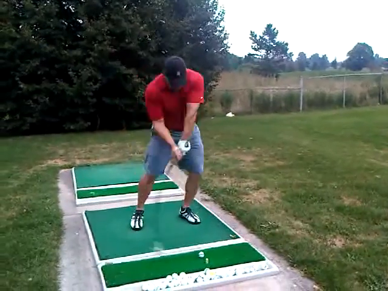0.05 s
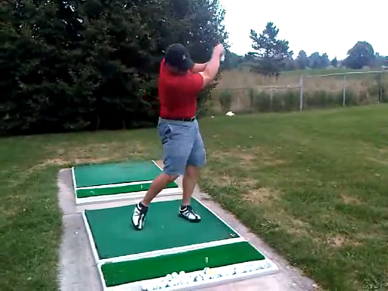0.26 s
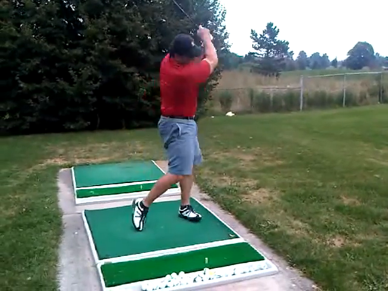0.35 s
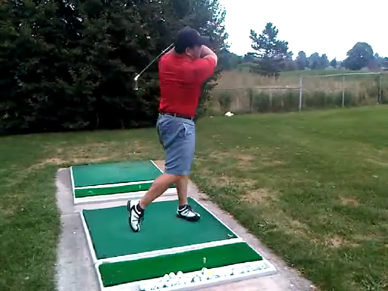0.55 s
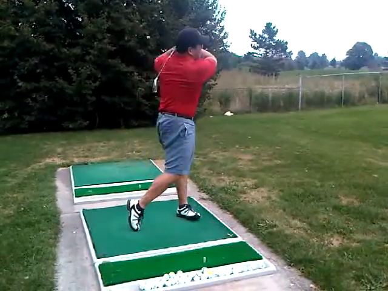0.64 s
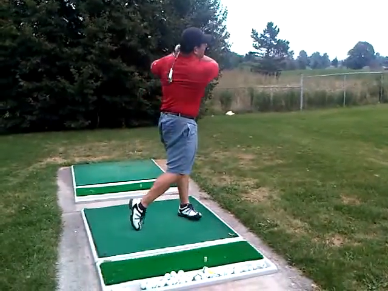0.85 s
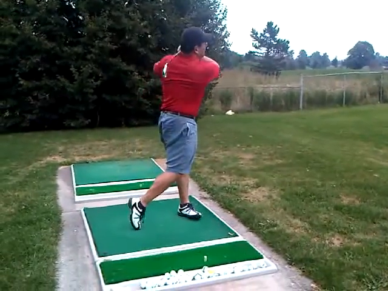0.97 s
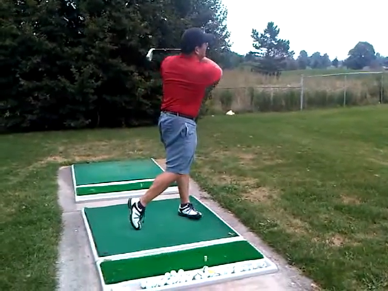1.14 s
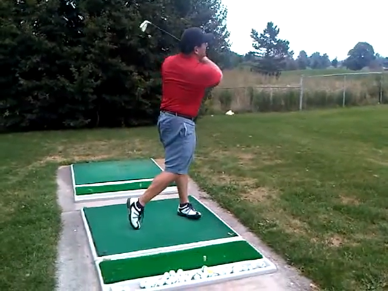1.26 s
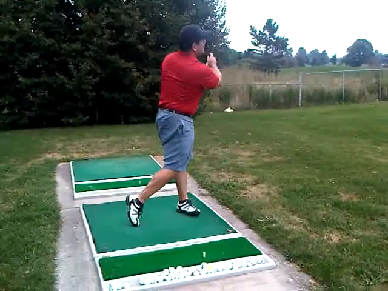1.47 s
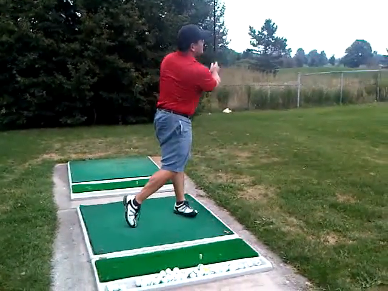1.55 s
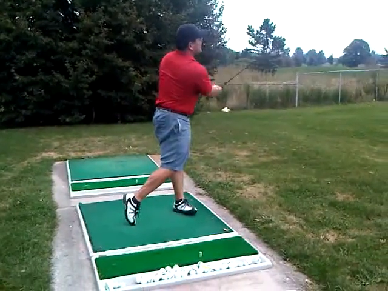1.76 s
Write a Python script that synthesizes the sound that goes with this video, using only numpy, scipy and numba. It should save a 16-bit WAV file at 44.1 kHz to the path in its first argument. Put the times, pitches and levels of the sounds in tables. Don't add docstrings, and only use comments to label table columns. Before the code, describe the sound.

Single golf shot outdoors: a short swish, a hard bright click with a tiny metallic ring and slap, a faint scatter off grass and trees, then gusts buffeting a small dull microphone over faint leaf hiss.

```python
import sys
import numpy as np
from scipy import signal
from scipy.fft import dct
from scipy.io import wavfile
from scipy.ndimage import uniform_filter1d
from numba import njit

SR = 44100
rng = np.random.default_rng(int(sys.argv[2]) if len(sys.argv) > 2 else 0)


def rack_gain(trim_db):
    fader = np.asarray(trim_db, float)
    return 10 ** (fader / 20)


def materialize(psi):
    bounded = np.clip(np.atleast_2d(psi).T, -1, 1)
    quanta = np.round(bounded * 32767).astype(np.int16)
    wavfile.write(sys.argv[1], SR, quanta)


N = 79380


@njit
def svf(x, hz, width):
    y, band, low = np.empty(len(x)), 0., 0.
    for i in range(len(x)):
        g = np.tan(np.pi * hz[i] / SR)
        damping = width[i] / hz[i]
        v = (band + g * (x[i] - low)) / (1 + g * (g + damping))
        band = 2 * v - band
        low = low + 2 * g * v
        y[i] = damping * v
    return y


def noise(hz, width_hz):
    hz, width_hz = hz * np.ones(N), width_hz * np.ones(N)
    once = svf(rng.standard_normal(N), hz, width_hz)
    twice = svf(once, hz, width_hz)
    return twice / np.sqrt(np.mean(twice ** 2))


def walk(rate):
    hold = int(SR / rate)
    steps = np.repeat(rng.standard_normal(N // hold + 1), hold)
    return 1.3 * uniform_filter1d(uniform_filter1d(steps, hold), hold)[:N]


def add(out, s, db, hz, cycles, phase):
    half = int(2 * cycles / hz * SR)
    i = np.arange(max(int(s * SR) - half, 0), min(int(s * SR) + half, N))
    turns = (i / SR - s) * hz
    bell = np.exp(-(2 * turns / cycles) ** 2)
    out[i] += rack_gain(db) * bell * np.cos(2 * np.pi * turns + phase)


def fade(t, start_s, t60_s):
    return (t >= start_s) * rack_gain(-60 * np.maximum(t - start_s, 0) / t60_s)


def hiss():
    # (frequency [Hz], density [dB per Hz])
    air_tilt = [(60, -9.5), (150, -3.5), (400, -8.5), (700, 1.5), (1300, -4.5), (4400, -13.5),
                (6400, -19.5), (7600, -22.5)]
    tilt_hz, tilt_db = np.array(air_tilt).T
    level_db, swell_db, flicker_db = -73, -1, -1
    out, swell = 0, walk(12)
    for hz in 60 * 2 ** np.arange(0, 7.1, .5):
        db = np.interp(np.log(hz), np.log(tilt_hz), tilt_db) + 10 * np.log10(hz)
        db = db + swell_db * swell + flicker_db * walk(12)
        out = out + rack_gain(db) * noise(hz, hz / 2)
    return rack_gain(level_db) * out / np.sqrt(np.mean(out ** 2))


def rustle(t):
    # (time [s], level [dB], centre [Hz], length [s])
    leaf_swells = [
        (.42, -81, 3000, .025),
        (.93, -81, 3200, .02),
        (1.622, -86, 4400, .013),
        (1.75, -84, 2800, .03),
    ]
    out = np.zeros(N)
    for s, db, hz, length_s in leaf_swells:
        out += rack_gain(db) * np.exp(-((t - s) / length_s) ** 2) * noise(hz, hz / 2)
    return out


def wind(t):
    # (time [s], level [dB])
    gust_curve = [(0, -65.5), (0.099, -69.5), (.17, -72), (.29, -70), (0.331, -56), (.37, -63),
                  (.56, -68.5), (0.664, -61), (0.684, -50), (0.978, -44.5), (1.05, -51), (1.261, -49.5),
                  (1.31, -63), (1.41, -59.5), (1.438, -48), (1.542, -58), (1.559, -61.5), (1.8, -66)]
    # (time [s], peak [dB], pitch [Hz])
    main_puffs = [(0.332, -41.5, 115.3), (0.392, -44, 133), (0.485, -47, 152), (0.514, -47.5, 144),
                  (0.687, -38, 129), (0.723, -39.5, 148.6), (0.757, -36.5, 197), (0.789, -32.5, 175),
                  (0.816, -31, 183), (0.839, -36.5, 129), (0.861, -43, 164), (0.893, -31, 159),
                  (0.926, -33, 203), (0.967, -33, 174), (0.992, -34, 185), (1.025, -34.5, 183),
                  (1.085, -38, 144), (1.106, -35, 167), (1.139, -37, 198), (1.202, -37, 163),
                  (1.22, -41.5, 136.7), (1.253, -40.5, 136), (1.275, -43, 153), (1.378, -40, 139),
                  (1.433, -36, 154), (1.464, -43.5, 150), (1.526, -38.5, 228), (1.576, -42, 205),
                  (1.604, -43.5, 130), (1.728, -42, 145)]
    # (time [s], peak [dB], pitch [Hz])
    more_puffs = [(.303, -46, 110), (.322, -48, 105), (.41, -51, 115), (.47, -52, 140), (.6, -57, 80),
                  (.628, -50, 95), (.978, -35, 130), (1.18, -44, 200), (1.445, -39, 170), (1.5, -46, 200),
                  (1.665, -55, 180), (1.745, -52, 130)]
    # (time [s], peak [dB], pitch [Hz])
    eddy_flicks = [(.678, -52, 330), (.758, -44, 400), (.894, -45, 520), (.926, -46, 450), (.957, -47, 480),
                   (.965, -43, 450), (.991, -43, 400), (1.022, -50, 350), (1.09, -52, 400),
                   (1.138, -50, 500), (1.2, -52, 380), (1.432, -50, 330), (1.463, -51, 380),
                   (1.526, -50, 380)]
    # (centre [Hz], width [Hz], level over the gust [dB], extra per dB of gust [dB])
    port_bands = [
        (55, 35, -10, -.3),
        (105, 70, -2, -.05),
        (190, 110, -5, .2),
        (320, 130, -19, .5),
    ]
    puff_db, puff_cycles = -0.5, 1.1
    buffet_db, buffets_per_s, own_db = 2.4, 55, 2.2
    port_top_hz = 420

    puffs = np.zeros(N)
    eddies = list(main_puffs) + list(more_puffs) + list(eddy_flicks)
    for (s, db, hz), turn in zip(eddies, rng.random(len(eddies))):
        add(puffs, s, db + puff_db, hz, puff_cycles, 2 * np.pi * turn)

    when, db = np.array(gust_curve).T
    gust = np.interp(t, when, db) + buffet_db * walk(buffets_per_s)
    flow = 0
    for hz, width_hz, over_db, steep in port_bands:
        band_db = gust + over_db + steep * (gust - db.max()) + own_db * walk(29.99)
        flow = flow + rack_gain(band_db) * noise(hz, width_hz)
    return puffs + signal.sosfilt(signal.butter(2, port_top_hz, fs=SR, output="sos"), flow)


def swing(t):
    # (time [s], vortex pitch of the shaft [Hz], level [dB])
    downswing = [
        (0.111, 250, -85),
        (.14, 310, -72.5),
        (0.166, 450, -62),
        (0.186, 610, -54.5),
        (.21, 620, -57.5),
        (0.237, 420, -61),
        (.265, 300, -66),
        (.3, 250, -84),
    ]
    when, pitch_hz, db = np.array(downswing).T
    head_db, head_steep = -5, 1.8
    hz = np.interp(t, when, pitch_hz)
    level_db = np.interp(t, when, db, left=-120, right=-120)
    shaft = rack_gain(level_db + 3.1 * walk(120)) * noise(hz, .6 * hz)
    tear_db = db.max() + head_db + head_steep * (level_db - db.max())
    return shaft + rack_gain(tear_db + 1.5 * walk(200)) * noise(2000, 3200)


def strike(t):
    # (time [s], level [dB], pitch [Hz], cycles)
    contacts = [
        (.21779, -13, 2600, .85),
        (.21852, -20.5, 5200, .9),
        (.21933, -20, 3000, 1.2),
        (.2211, -26, 2900, 1.1),
        (.22175, -25.5, 1800, 1.3),
        (.2244, -32, 1900, 1.4),
        (.21826, -29, 6400, 5),
    ]
    # (time [s], level [dB], pitch [Hz], cycles)
    late_knocks = [
        (.232, -45, 600, 1.1),
        (.231, -48, 6000, 8),
        (.2485, -48, 1400, 2.5),
        (.226, -56, 260, 2.5),
        (.245, -58, 200, 3),
        (.263, -60, 150, 2),
    ]
    # (frequency [Hz], level [dB], t60 [s])
    head_modes = [(460, -11, .045), (780, -15, .03), (940, -15, .03), (1300, -7, .035), (1720, -6, .035),
                  (2045, -1, .035), (2640, -5, .04), (3250, 0, .038), (3950, -13, .025), (4550, -9, .028),
                  (5000, -8, .025), (6250, -13, .022), (6720, -14, .02)]
    strike_s, ring_db = .2181, -35
    rattle_db, rattle_t60_s = -39, .035
    scatter_db, scatter_t60_s = -51.5, .23
    trees_s, trees_db, trees_spread_s = .247, -57, .008

    clicks = np.zeros(N)
    for s, db, hz, cycles in list(contacts) + list(late_knocks):
        add(clicks, s, db, hz, cycles, np.pi / 2)

    ring = np.zeros(N)
    for k, (hz, db, t60_s) in enumerate(head_modes):
        tone = np.sin(2 * np.pi * hz * (t - strike_s))
        ring += (-1) ** k * rack_gain(ring_db + db) * fade(t, strike_s, t60_s) * tone

    rattle = rack_gain(rattle_db + 5.9 * walk(900)) * fade(t, strike_s, rattle_t60_s) * noise(2800, 3200)
    grass = rack_gain(scatter_db) * fade(t, strike_s, scatter_t60_s)
    trees = rack_gain(trees_db) * np.exp(-((t - trees_s) / trees_spread_s) ** 2)
    grain = rack_gain(2.2 * walk(250))
    return clicks + ring + rattle + (grass + trees) * grain * noise(2240, 4000)


def scene():
    t = np.arange(N) / SR
    return (hiss() + rustle(t) + wind(t) + swing(t) + strike(t))[None]


def starve(x):
    # (centre time [s], treble thins above [Hz], length [s])
    thin_moments = [(.15, 6800, .07), (.41, 4300, .085), (.54, 3300, .085), (.665, 2600, .085),
                    (.772, 4800, .03), (.79, 4600, .03), (.808, 5200, .03), (1.092, 4500, .03),
                    (1.11, 4200, .03), (1.128, 3000, .03), (1.24, 2700, .075), (1.37, 2600, .08),
                    (1.5, 4800, .085), (1.62, 5200, .085)]
    keep_over_db, kept_db = 6.2, 3.5
    out = x.copy()
    for s, hz, length_s in thin_moments:
        size = int(length_s * SR)
        bell = np.sqrt(signal.windows.tukey(size, .7))
        line_hz = np.arange(size) * SR / size / 2
        i = int(s * SR) - size // 2 + np.arange(size)
        lines = dct(x[i] * bell, norm="ortho")
        around = uniform_filter1d(lines ** 2, size=size // 50)
        strong = lines ** 2 > rack_gain(2 * keep_over_db) * around
        change = np.where(line_hz > hz, lines * (strong * rack_gain(kept_db) - 1), 0)
        out[i] += bell * dct(change, type=3, norm="ortho")
    return out


def roll_off(x):
    return signal.sosfilt(signal.butter(12, 8760, fs=SR, output="sos"), x)


def record(dry):
    low_hz, top_hz, floor_db = 58.4, 7650, -101
    x = signal.sosfilt(signal.butter(3, low_hz, "high", fs=SR, output="sos"), dry)
    x = signal.sosfiltfilt(signal.butter(8, top_hz, fs=SR, output="sos"), x)
    mix = starve(x[0])[None] + rack_gain(floor_db) * rng.standard_normal(x.shape)
    return roll_off(mix)


dry = scene()
out = record(dry)
materialize(out)
```